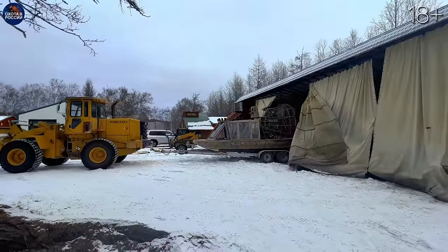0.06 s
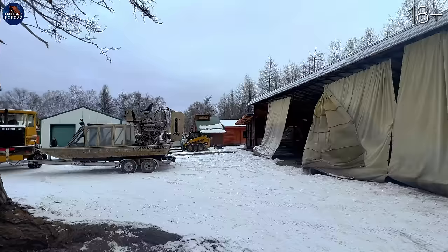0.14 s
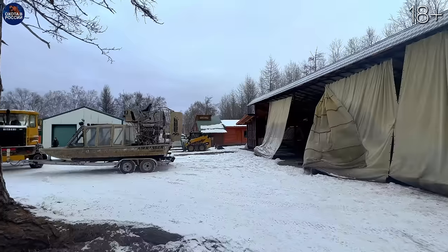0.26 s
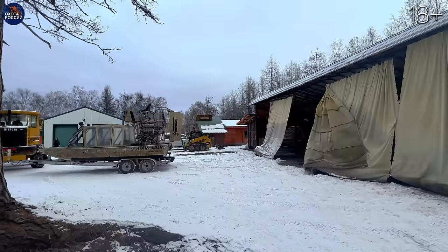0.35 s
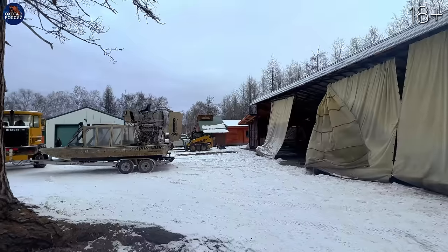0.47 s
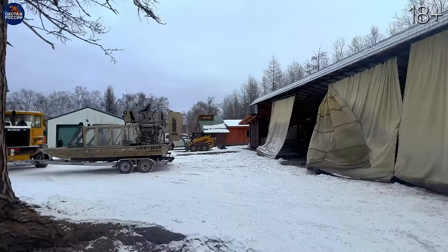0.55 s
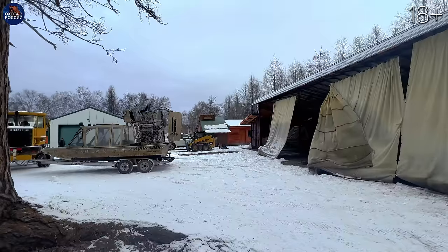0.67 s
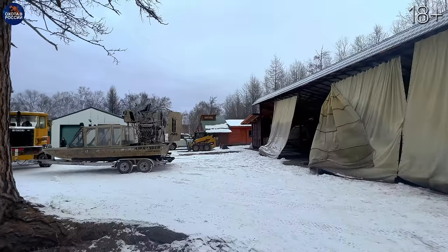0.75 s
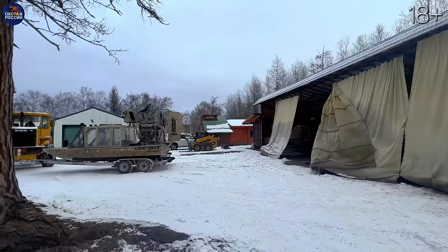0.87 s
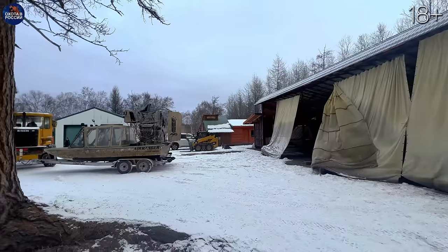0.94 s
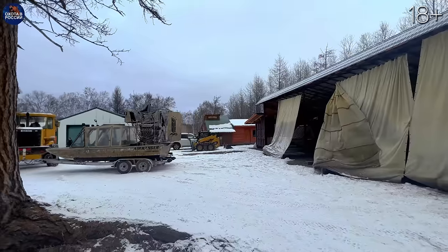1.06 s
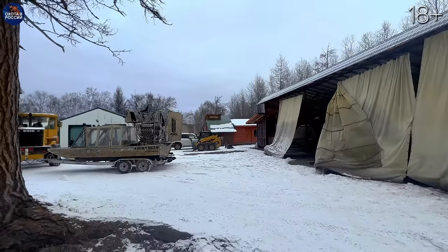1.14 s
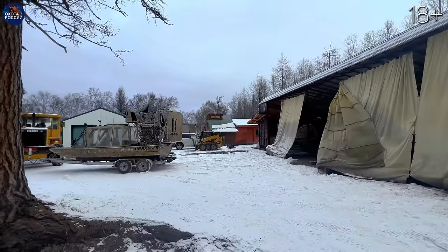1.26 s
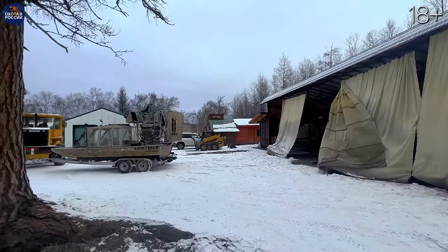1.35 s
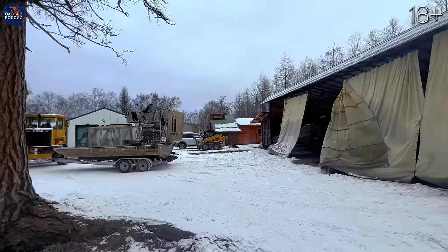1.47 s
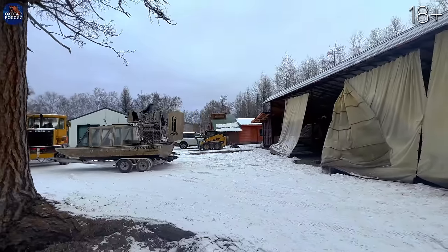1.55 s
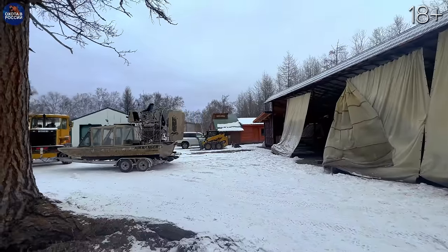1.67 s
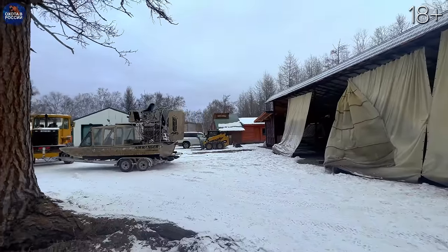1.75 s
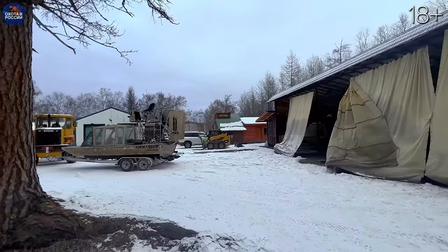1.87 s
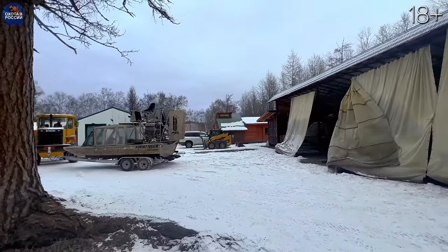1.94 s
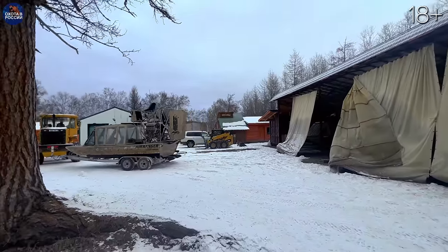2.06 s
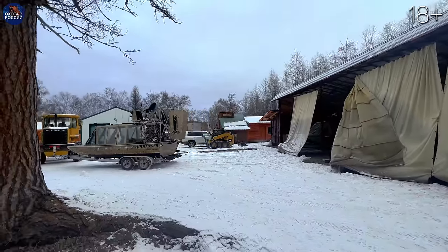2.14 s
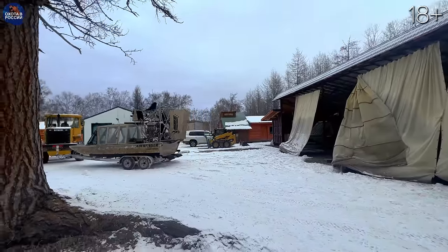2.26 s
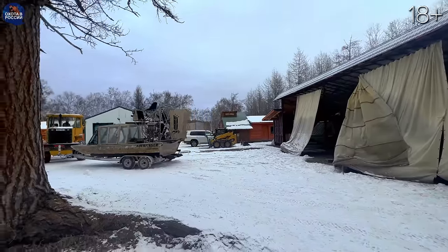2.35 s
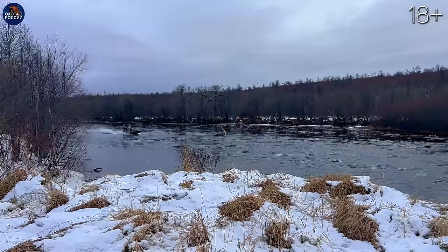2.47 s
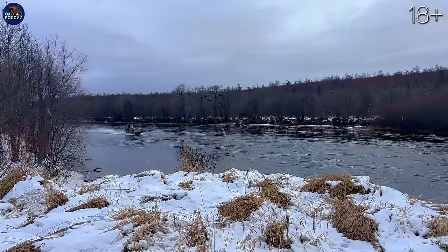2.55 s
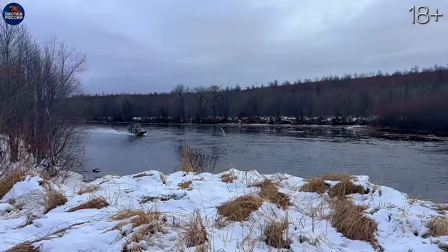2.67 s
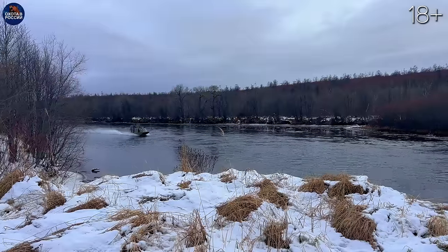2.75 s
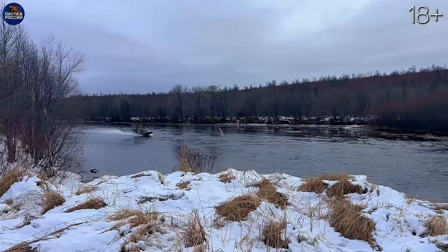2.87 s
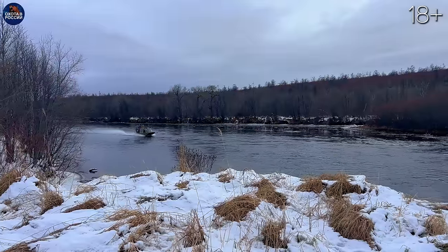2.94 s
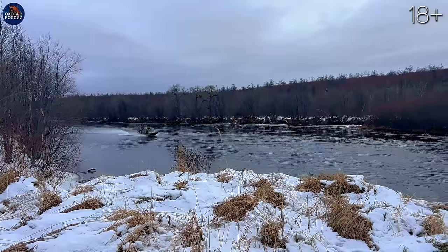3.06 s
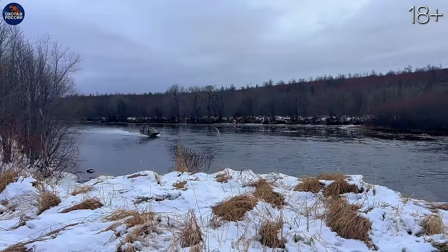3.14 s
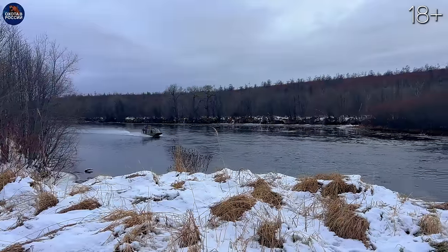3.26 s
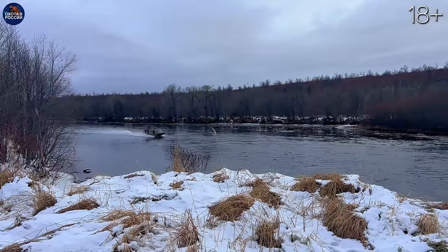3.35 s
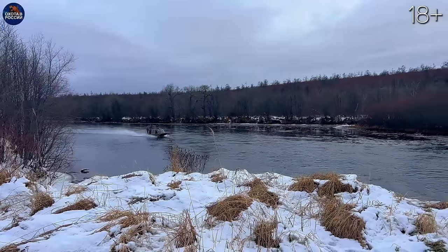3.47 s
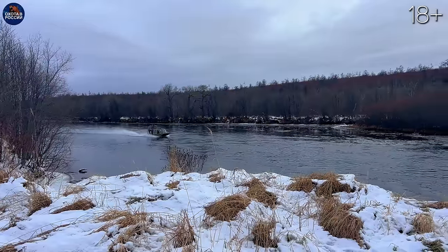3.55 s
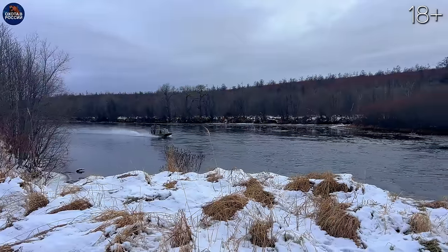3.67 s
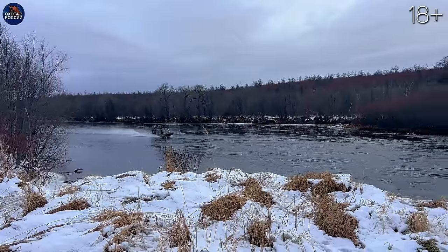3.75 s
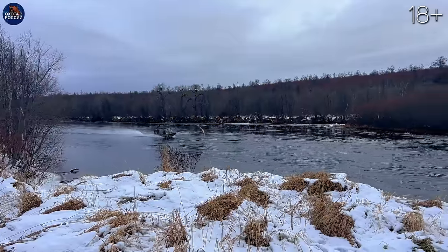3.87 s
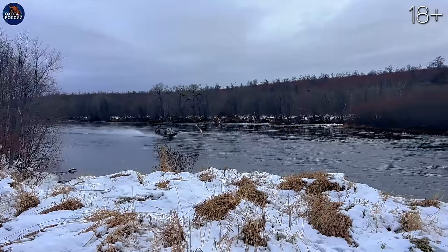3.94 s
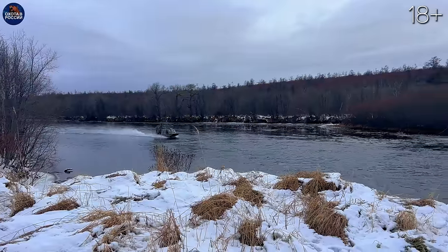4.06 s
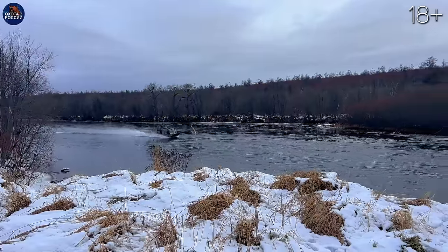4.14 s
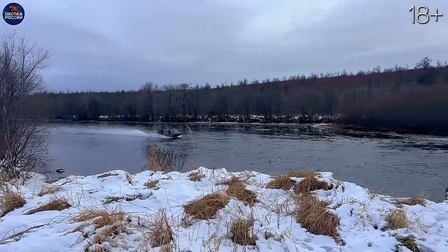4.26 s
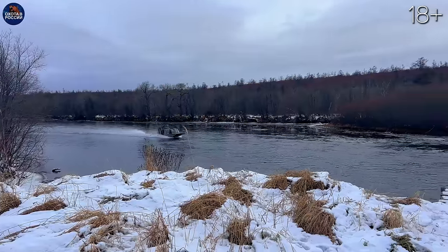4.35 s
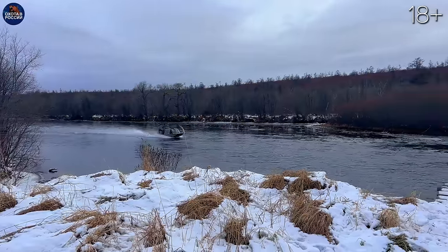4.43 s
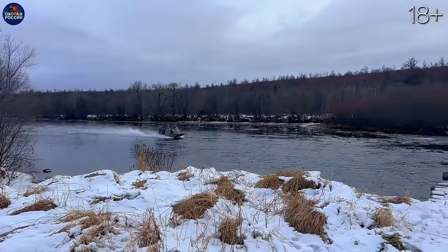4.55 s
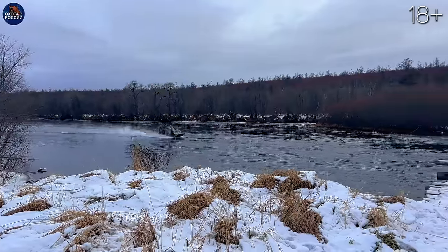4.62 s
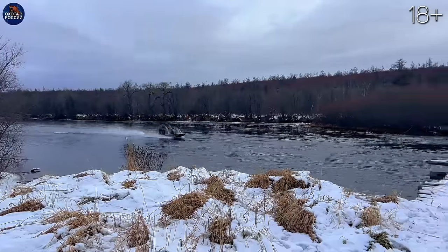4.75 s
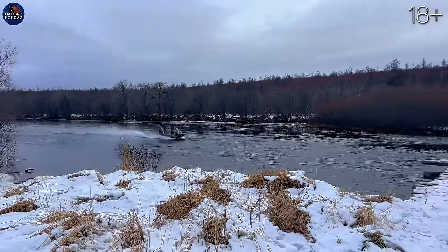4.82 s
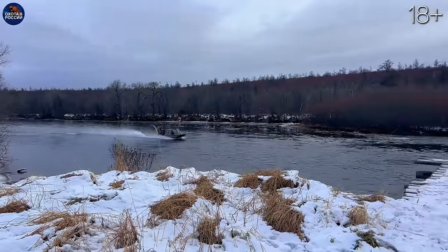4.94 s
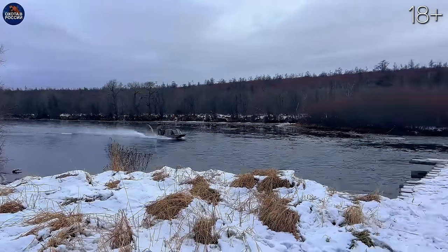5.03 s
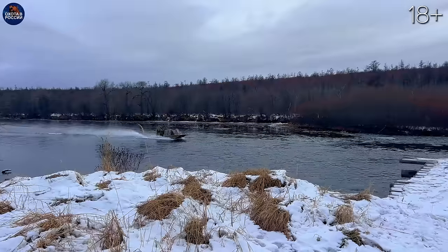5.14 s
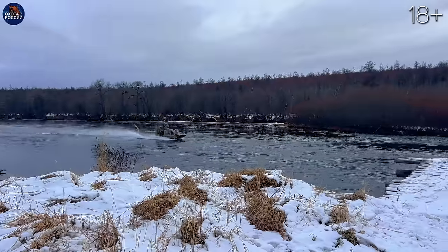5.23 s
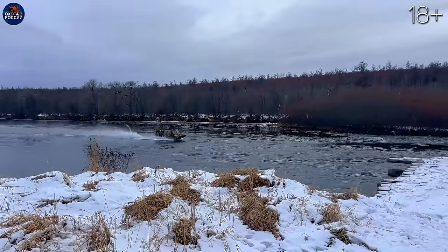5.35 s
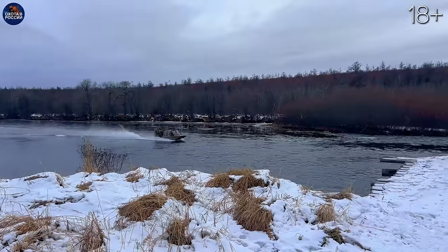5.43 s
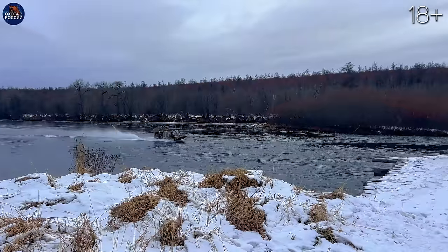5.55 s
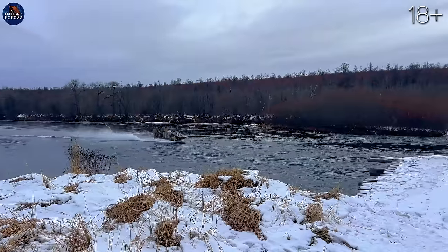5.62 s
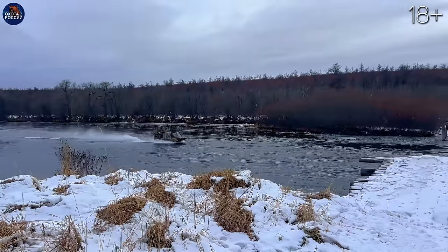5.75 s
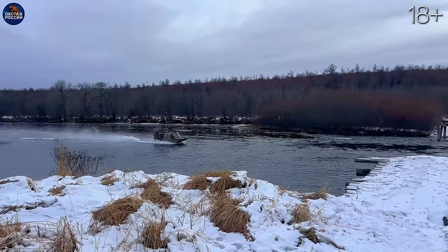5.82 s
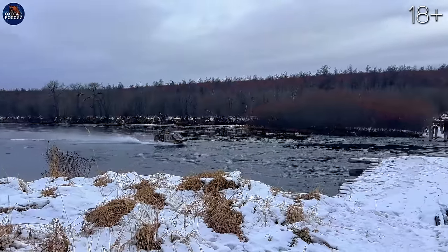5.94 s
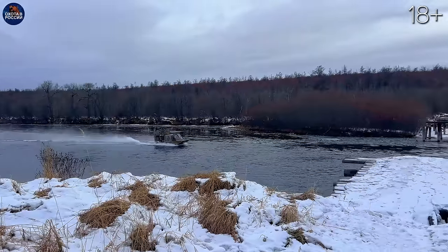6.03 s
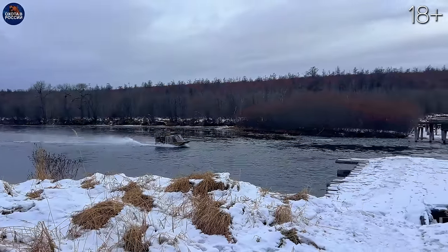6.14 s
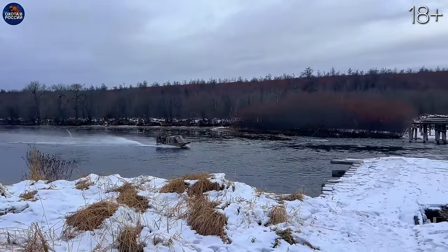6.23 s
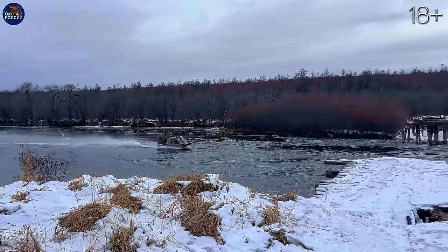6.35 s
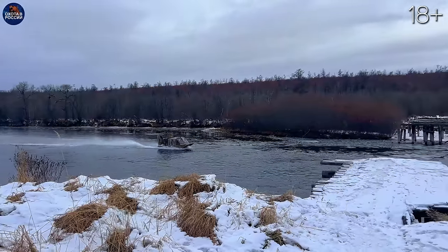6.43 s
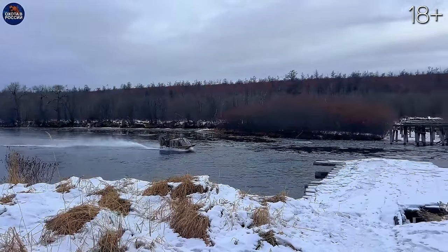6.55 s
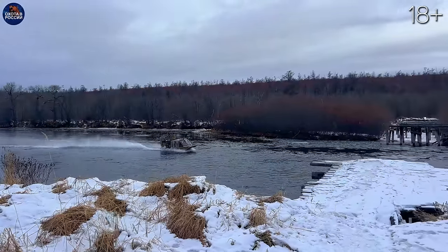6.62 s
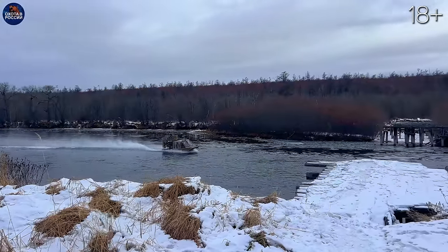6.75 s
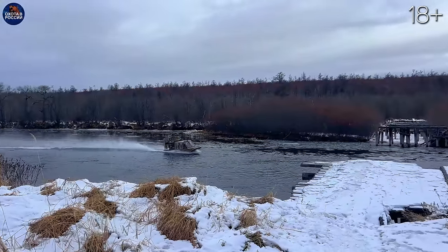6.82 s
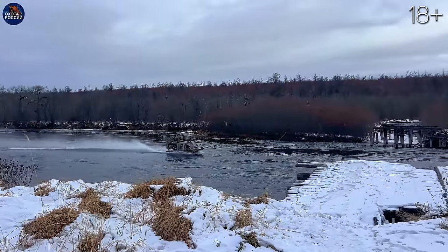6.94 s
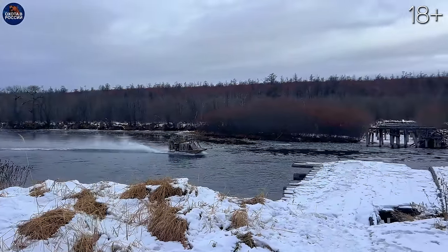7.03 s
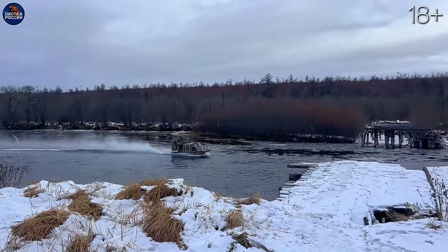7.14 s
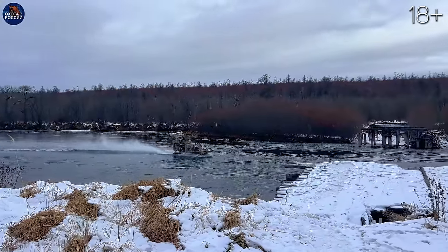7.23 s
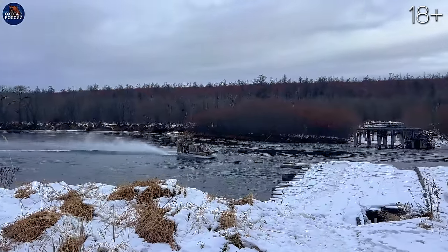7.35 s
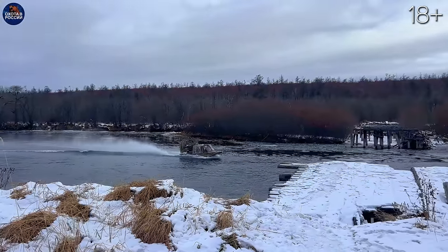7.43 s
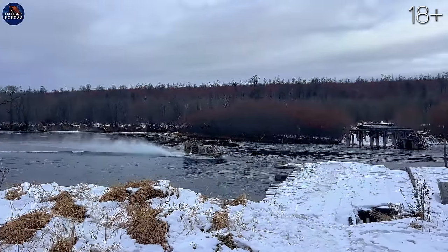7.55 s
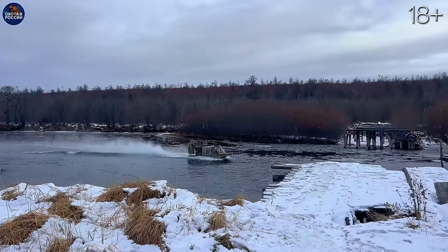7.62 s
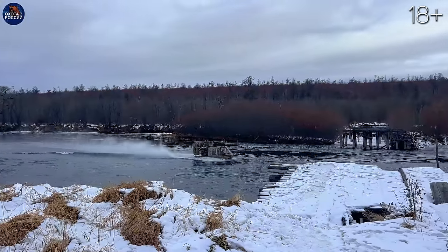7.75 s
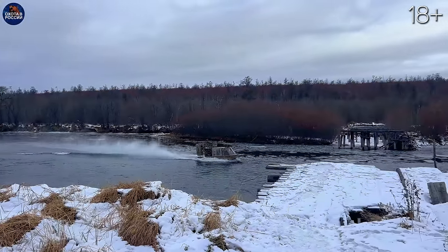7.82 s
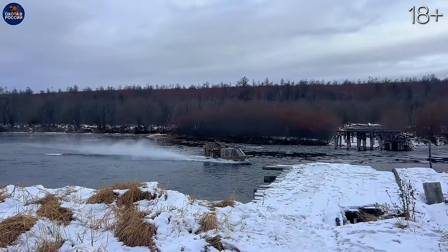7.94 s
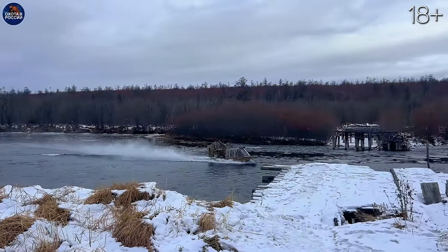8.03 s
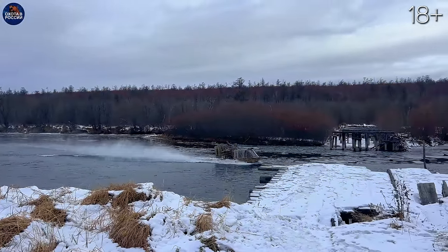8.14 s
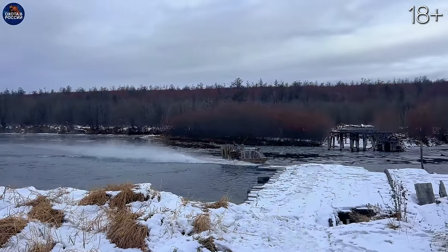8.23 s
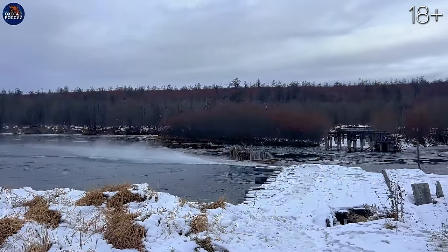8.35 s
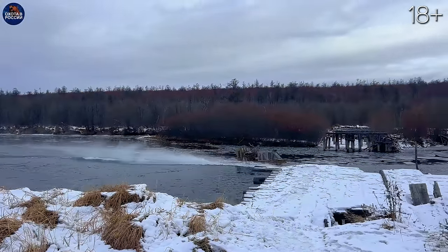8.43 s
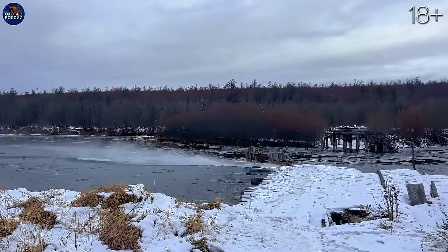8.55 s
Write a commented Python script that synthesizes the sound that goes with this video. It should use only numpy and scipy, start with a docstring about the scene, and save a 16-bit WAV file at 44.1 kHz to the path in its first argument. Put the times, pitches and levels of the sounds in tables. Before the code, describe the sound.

A stereo microphone outdoors first catches a large diesel engine: two short, booming revs, then a chugging idle under faint high hydraulic singing. The sound blends into a distant airboat opening its throttle. Its steady low drone flutters quickly, chopped air rasping and buzzing around it; over six seconds it draws closer, gaining exhaust bark, bright spray-like hiss and power, still loud at the end.

```python
"""Wheel loader, then airboat

A diesel wheel loader revs twice in a snowy yard and drops to idle, its hydraulics singing faintly.
The yard dissolves into a river, where an airboat picks up speed and draws nearer. Its V8 exhaust and its
geared four-blade propeller are sums of tones; the strongest sound 14 Hz apart, so the drone throbs.
Noise in puffs makes the rasp and hiss of air chopped by the blades, and the loader's roar and clatter."""
import sys
import numpy as np
from scipy.fft import rfft, irfft, next_fast_len
from scipy.io import wavfile
from scipy.ndimage import map_coordinates

SR = 44100
rng = np.random.default_rng(int(sys.argv[2]) if len(sys.argv) > 2 else 0)


def log_audio(samples):
    """Write samples as a 16-bit WAV file to the path given in sys.argv[1]."""
    # one column per channel
    frames = np.atleast_2d(samples).T
    # limit to full scale, then quantise
    limited = np.clip(frames, -1, 1)
    pcm = np.round(limited * 32767).astype(np.int16)
    wavfile.write(sys.argv[1], SR, pcm)


N = 378819

# The loader's engine speed. Each row: time in seconds, firings per second.
LOADER_FIRING = [(0.0, 49.6), (0.15, 49), (0.3, 57), (0.41, 58), (0.5, 51), (0.6, 45.5), (0.76, 46),
                 (0.89, 50.5), (1.0, 52), (1.16, 51), (1.28, 35.5), (1.48, 38.8), (2.25, 35.6),
                 (2.45, 39.4)]
# The microphone pair, for sound from the yard and from the river. Each row: frequency in Hz,
# radians by which the left lags, left minus right in dB, likeness of the two (coherence, 0 to 1).
YARD_PORTS = [(80, 0.26, -1.5, 0.98), (305, 0.87, -4.5, 0.99), (517, -1.6, -9.5, 0.34),
              (1050, 0.5, 1, 0.26), (1400, -0.25, -2, 0.4), (2200, -1.24, -4.5, 0.99),
              (4270, -1.7, 0, 0.32), (5430, -1.6, 9.5, 0.33), (8450, -0.83, -4, 0.23)]
RIVER_PORTS = [(280, -.05, -1.7, .99), (520, -.45, -2.5, .98), (860, -1.6, 3, .95), (1060, -1.2, 4, .92),
               (1300, -1.9, 0, .92), (1480, -3.1, -1, .85), (1680, -4.3, 0, .75), (1830, -3.2, 0, .7),
               (2130, -6.3, -4, .8), (2360, -9.4, 1, .65), (2620, -12.6, 2, .7), (2860, -15.7, 5, .55),
               (3150, -18.8, 4, .75), (3700, -19.5, -1, .65), (4600, -21.5, 8, .3), (5700, -25, 2, .6),
               (7200, -26.4, 5, .45), (8300, -25.1, 0, .9), (15500, -12.6, 0, .9)]

RASP_DB = -38  # the blades' rasp with the boat at its closest, before its swells and dips


def amp(db):
    """Turns decibels into a gain."""
    return 10 ** (np.asarray(db) / 20)


def unit(x):
    """Scales a sound to rms 1."""
    return x / np.sqrt(np.mean(x ** 2) + 1e-20)


def along(points, hz):
    """Reads each column after the frequency at the given Hz, on a log axis."""
    f, *cols = np.transpose(points)
    return [np.interp(np.log(hz + 1), np.log(f + 1), c) for c in cols]


def curves(rows):
    """Gives one value per sample for each column after the time."""
    s, *cols = np.transpose(rows)
    return [np.interp(np.arange(N) / SR, s, c) for c in cols]


def swells(rows, lag_s=0):
    """Adds up (s, half length s, height) bumps, lag_s later: each swells, holds and ebbs."""
    squareness = 2.56  # higher: quicker rise and fall, flatter hold
    t = np.arange(N) / SR - lag_s
    return sum(height * np.exp(-abs((t - s) / half_s) ** squareness) for s, half_s, height in rows)


def wobble(rate):
    """A smooth random curve through rate random points a second."""
    points = rng.standard_normal(int(N * rate / SR) + 4)
    # worked out every 64 samples, then joined by straight lines
    coarse = map_coordinates(points, [np.arange(0, N + 64, 64) * rate / SR])
    return np.interp(np.arange(N), 64 * np.arange(len(coarse)), coarse)


def filtered(x, response):
    """Multiplies the spectrum of x by a response of frequency, which may be complex."""
    m = next_fast_len(N + SR // 10, real=True)
    return irfft(rfft(x, m) * response(np.fft.rfftfreq(m, 1 / SR)), m)[..., :N]


def rush(spectrum, ports):
    """Coloured stereo noise of rms 1, as alike in both ports as the direction allows."""
    def colour(hz):
        coherence = along(ports, hz)[2]
        turn = np.arccos(np.clip(coherence, 0, 1)) / 2
        return amp(along(spectrum, hz)[0]) * [np.cos(turn), np.sin(turn)]
    mid, side = filtered(rng.standard_normal((2, N)), colour)
    return unit(np.array([mid + side, mid - side]))


def heard(x, ports, shift=0):
    """Gives the two ports their phase and level differences, moved down in frequency by a share."""
    def response(hz):
        lag, balance_db, _ = along(ports, hz * (1 + shift))
        left = amp(balance_db / 2) * np.exp(-.5j * lag)
        right = amp(-balance_db / 2) * np.exp(.5j * lag)
        gains = np.array([left, right])
        return gains / np.sqrt(np.mean(abs(gains) ** 2, axis=0))
    return filtered(x, response)


def angle(rate):
    """Radians turned so far at a rate in turns per second."""
    return 2 * np.pi * np.cumsum(rate) / SR


def tone(phase):
    """A sine of rms 1 that starts anywhere in its cycle."""
    return np.sqrt(2) * np.sin(phase + rng.uniform(0, 2 * np.pi))


def puffs(phase, sharpness):
    """A gain of rms 1 that peaks once a cycle."""
    return unit(np.exp(sharpness * np.cos(phase)))


def hydraulics():
    """The pump hums and its valves sing thinly while the engine idles."""
    # Each row: frequency in Hz, level in dB before the 3 dB lift and the load below.
    valve_tones = [(5303, -78.5), (5884, -79), (7340, -88), (8021, -83)]
    # Each row: time in seconds, hydraulic load as a gain in dB.
    pump_load = [(1.5, -40.5), (1.6, -3), (2.25, -4.5), (2.6, -12)]
    load_db, = curves(pump_load)
    whine = 0
    for hz, db in valve_tones:
        whine = whine + amp(db + 3 + 2 * wobble(12)) * tone(angle(hz + 7 * wobble(30)))
    hum = amp(-53) * tone(angle(156 + 2 * wobble(4.5)))
    return amp(load_db) * (whine + hum)


def panel():
    """A loose sheet of metal, shaken once at the second rev, rings out as a fading sine."""
    start_s, pitch_hz, start_db, fall_60_db_s = 0.83, 1560, -50, 0.6
    t = np.maximum(np.arange(N) / SR - start_s, 0)
    return amp(start_db - 60 * t / fall_60_db_s) * np.sin(2 * np.pi * pitch_hz * t)


def lugging():
    """Fresh fuel in a slow engine knocks harshly: a band of noise, one burst for each firing."""
    # Each row: middle in seconds, half length in seconds, level in dB.
    knock_times = [(0.247, 0.09, -47), (0.702, 0.008, -48), (0.741, 0.027, -42)]
    centre_hz, half_width_hz = 1300, 120
    rate, = curves(LOADER_FIRING)
    noise = rng.standard_normal(N)
    knock = unit(filtered(noise, lambda hz: 1 / (1 + ((hz - centre_hz) / half_width_hz) ** 2)))
    level = swells([(s, half_s, amp(db)) for s, half_s, db in knock_times])
    return level * knock * puffs(angle(rate), sharpness=0.33)


def loader():
    """Diesel firings boom from the pipe and rattle the block; under load the engine roars and hisses."""
    # The driver's pedal, pressed (+) or lifted (-). Each row: middle in seconds, half length in
    # seconds, fuel over idle as a share of full.
    pedal = [(0.017, 0.12, 0.39), (0.264, 0.12, 1.01), (0.619, 0.1, -0.057), (0.724, 0.03, -0.075),
             (0.811, 0.085, 1.064), (0.93, 0.051, 0.15), (1.064, 0.048, 0.46), (1.331, 0.11, -0.45),
             (1.464, 0.072, 0.25)]
    # The drone above the boom, slower to rise and fall. Each row: time in seconds, pitch in Hz.
    drone_pitch = [(0.08, 98.3), (0.3, 107.6), (0.47, 112.7), (0.62, 104.7), (0.7, 93.5), (0.8, 87.6),
                   (0.95, 93.26), (1.06, 100.1), (1.2, 102.9), (1.27, 100.4), (1.36, 88.5), (1.48, 74.9),
                   (1.7, 75.7), (1.83, 77), (2.0, 75.45), (2.25, 74.1), (2.45, 81.53)]
    # How loud the drone is at each pitch. Each row: pitch in Hz, level in dB before a 4.5 dB cut.
    drone_level = [(72, -40.5), (86, -39.5), (95, -38), (101, -47.5), (108, -40), (116, -48)]
    # How the pipe colours its overtones. Each row: frequency in Hz, gain in dB.
    pipe = [(110, -4.5), (138, -7), (155, 0), (178, -11), (193, -5), (205, 5.5), (220, -2), (235, -10.5),
            (262, -3), (300, -13.5), (335, -8.5)]
    # Colours of three noises. Each row: frequency in Hz, relative level in dB per Hz.
    roar_colour = [(22, -40), (55, -5), (200, -1.5), (330, -2), (375, -11), (425, 0), (480, -4), (630, -6),
                   (700, 3.5), (770, -4), (850, 2), (980, -6.5), (1290, 1), (1420, -5.5), (1600, -14.5),
                   (1780, -6), (2000, -6.5), (2230, -15), (2500, -11.5), (2800, -22.5), (4500, -56)]
    hiss_colour = [(1500, -33), (2800, -2), (2980, 9), (3250, 2.5), (4000, 2.5), (4300, 3.5), (5300, 2.5),
                   (7000, -7.5), (8500, -5), (11000, -23.5), (13000, -36), (15700, -38)]
    clatter_colour = [(100, -7), (295, 10.5), (370, -5.5), (440, 6.5), (1000, -10), (1400, -24), (1900, -4),
                      (2060, -7.5), (2250, -15), (3200, -17.5), (5000, -50)]

    rate, = curves(LOADER_FIRING)
    drone_hz, = curves(drone_pitch)
    firing, drone = angle(rate), angle(drone_hz)
    load = swells(pedal)

    # the boom follows the fuel a little late, levels off near full and grows with the firing rate
    boom_load = np.tanh(swells(pedal, lag_s=0.027) / 0.85)
    boom_db = -47 + 14 * boom_load + 0.31 * (rate - rate.mean())
    exhaust = amp(boom_db) * tone(firing)
    drone_db, = along(drone_level, drone_hz)
    exhaust += amp(drone_db - 4.5 + 3.7 * wobble(18.0)) * tone(drone)
    # unequal cylinders
    exhaust += amp(-50.5 + 1.4 * wobble(6.4)) * tone(3 / 2 * firing + 4.65 * wobble(15.0))
    # speed and fuel drive the pipe harder
    overtone_db = -51.5 + 0.2 * (rate - 48) + 2.5 * load
    for hz in (3 * rate, 2 * drone_hz, 3 * drone_hz):
        level_db = overtone_db + along(pipe, hz)[0] + 2 * wobble(9)
        exhaust += amp(level_db) * tone(angle(hz) + 0.35 * wobble(14))

    roar_db = -51.5 + 12.5 * load + 1.23 * wobble(45.34)
    roar = amp(roar_db) * rush(roar_colour, YARD_PORTS) * puffs(firing, sharpness=0.13)
    hiss_db = -68 + 12 * load
    hiss = amp(hiss_db) * rush(hiss_colour, YARD_PORTS) * puffs(firing, sharpness=0.12)
    clatter_db = -53 + 0.15 * (rate - 41)  # a little louder at higher speed
    clatter = amp(clatter_db) * rush(clatter_colour, YARD_PORTS) * puffs(firing, sharpness=0.073)
    return exhaust + roar + hiss + clatter


def approach():
    """Levels along a straight course past the bank: all grow with nearness but the bark, which grows abeam."""
    # The blade noise swells and dips on its way over the water. Each row: time in seconds, gain in dB.
    water_swell = [(3.2, 0), (4.4, 0.88), (5.1, 0.4), (6.1, 1.7), (6.85, -0.5), (7.4, 0.5), (8.2, 0.5)]
    closest_m, closest_s, boat_m_per_s = 64, 8.52, 13.76
    t = np.arange(N) / SR
    distance_m = np.hypot(closest_m, boat_m_per_s * (t - closest_s))
    near_db = 20 * np.log10(closest_m / distance_m)  # 0 at the closest
    swell_db, = curves(water_swell)
    # each: level at the closest, then dB gained for each dB of nearness
    boom_db = -30.8 + 0.95 * near_db
    tone_db = -30.5 + 1.5 * near_db
    rasp_db = RASP_DB + 0.55 * near_db + swell_db
    hiss_db = -45.5 + 1.98 * near_db + swell_db
    # the open pipes swing towards the bank
    abeam = (1 + np.tanh((t - 6.27) / 1)) / 2
    bark_db = -36 + 7 * abeam
    return boom_db, tone_db, bark_db, rasp_db, hiss_db


def v8(cycle, boom_db, bark_db):
    """Uneven firing in each bank stresses the odd orders; the higher ones waver over the water."""
    # Each row: multiple of the four-stroke cycle, gain in dB.
    orders = [(1.333, -24), (2, -16), (2.667, -25), (3, 1), (4, -27), (5, -5), (6, -21.5), (7, -17.5),
              (8, -20), (9, -10.5), (10, -14.5), (11, -19.5), (11.5, -26), (14, -23), (15, -25), (16, -27),
              (17, -24), (21, -21), (23, -32.5), (26, -36), (27, -26.5)]
    throttle_s, throttle_span_s, light_load_db = 2.5, 0.037, -6.5
    hum_db = -32.5  # the middle orders hold their level while boom and bark grow
    # the whole exhaust is softer until the throttle is wide open
    t = np.arange(N) / SR
    eased_db = light_load_db * (1 - np.tanh((t - throttle_s) / throttle_span_s)) / 2
    out = np.zeros(N)
    for k, db in orders:
        level_db = boom_db if k < 4 else hum_db if k < 8 else bark_db
        unsteady = np.clip((k - 5) / 10, 0, 1) ** 2
        drift = unsteady * (4 * rng.standard_normal() + .5 * wobble(10))
        dispersion = np.pi / 5 * k ** 2  # the pipe spreads each pulse out in time
        gain = amp(level_db + db + (0.5 + 2.0 * unsteady) * wobble(6))
        out += gain * np.sqrt(2) * np.cos(k * cycle + dispersion + drift)
    return amp(eased_db) * out


def propeller(passing, tone_db):
    """Each blade leaves a lopsided suction pulse; scattered paths make its overtones fade and flutter."""
    # Each row: multiple of the blade rate, gain in dB. The first row is left out below.
    blade_overtones = [(1, 0), (2, -14), (3, -15.5), (4, -14), (5, -17), (6, -17.5), (7, -18), (8, -20.5),
                       (9, -22), (10, -23.5), (11, -20.5), (12, -25.5), (13, -27)]
    # How the third to fifth multiples carry over the water. Each row: time in seconds, gain in dB.
    buzz = [(2.3, -3.5), (3.1, 0.5), (5.0, 0), (6.5, -5), (7.3, -5.5), (8.0, 2.5), (8.5, 0)]
    fading, flutter = 0.22, 0.45  # slow and fast scattered shares of each overtone
    buzz_db, = curves(buzz)
    # the other overtones gain 0.45 dB for each dB of blade tone
    grown_db = 0.45 * (tone_db - tone_db[N // 2:].mean())
    out = amp(tone_db) * np.cos(passing)
    for k, db in blade_overtones[1:]:
        carried_db = buzz_db if 2 < k < 6 else grown_db
        scattered = np.clip((k - 1) / 3, 0, 1) ** 2
        a, b = (scattered * (fading * wobble(3) + flutter * wobble(30)) for _ in range(2))
        skew = (k - 1) * np.pi / 3
        spread = (k - 1) * (k - 2) * np.pi / 20
        phase = k * passing + skew + spread
        out += amp(-33.5 + db + carried_db) * ((1 + a) * np.cos(phase) + b * np.sin(phase))
    return -np.sqrt(2) * out


def airboat():
    """A reduction gear locks engine and propeller; strongest tones throb, 200 Hz overtones beat slowly."""
    # The crankshaft's speed. Each row: time in seconds, turns per minute.
    crank_speed = [(1.9, 3122), (2.3, 3094), (2.7, 3324), (3.2, 3402), (4.0, 3422), (5.0, 3437),
                   (6.5, 3434), (7.6, 3424), (8.05, 3360), (8.59, 3353)]
    # Colours of the chopped air, the spray and the finest spray.
    # Each row: frequency in Hz, relative level in dB per Hz.
    rasp_colour = [(22, -41), (65, -3), (165, -5.5), (240, -4), (300, -4), (420, -1.5), (550, -4),
                   (700, -4.5), (900, -8.5), (1150, -6), (1500, -12.5), (1750, -12.5), (2080, -15.5),
                   (2600, -19.5), (5000, -59)]
    spray_colour = [(900, -21), (1900, -2.5), (2700, 2), (3300, -1.5), (4500, -3), (5800, -6.5),
                    (6700, -13), (8300, -13), (9500, -14), (11000, -49), (15700, -42)]
    mist_colour = [(5000, -39), (8500, -27), (11300, 12.5), (13000, 6), (15700, -6)]
    gear_ratio = 2.2914  # crank turns for each propeller turn

    rpm, = curves(crank_speed)
    boom_db, tone_db, bark_db, rasp_db, hiss_db = approach()
    crank = angle(rpm / 60)
    passing = 4 * crank / gear_ratio - np.pi / 2  # four blades
    # the blade noise comes in puffs, one for each blade
    rasp_gain = amp(rasp_db + 0.89 * wobble(13))
    rasp = rasp_gain * rush(rasp_colour, RIVER_PORTS) * puffs(passing, sharpness=0.17)
    hiss_gain = amp(hiss_db + 0.31 * wobble(16))
    hiss = hiss_gain * rush(spray_colour, RIVER_PORTS) * puffs(passing, sharpness=0.099)
    # the air swallows the top treble, so it grows fastest as the boat nears
    mist_db = -67.0 + 2.0 * (hiss_db + 48) + 0.99 * wobble(17)
    mist = amp(mist_db) * rush(mist_colour, RIVER_PORTS)
    mesh = 48 * crank  # the gear whines 48 cycles for each crank turn
    whine_db = -58.5 + 2.7 * (rasp_db - RASP_DB) + 2.7 * wobble(8.8)
    gear_whine = amp(whine_db) * tone(mesh + 0.6 * wobble(13))
    engine = v8(crank / 2, boom_db, bark_db)  # a four-stroke cycle takes two turns
    return engine + propeller(passing, tone_db) + rasp + hiss + mist + gear_whine


def over_bank(x):
    """The snowy bank soaks up a band in the middle of the sound while the boat is far off."""
    # Each row: time in seconds, share of the band lost.
    bank_loss = [(2.9, 0.54), (4.4, 0.0083)]
    centre_hz, half_width_hz = 1110, 330
    lost, = curves(bank_loss)
    return x - lost * filtered(x, lambda hz: np.exp(-((hz - centre_hz) / half_width_hz) ** 2))


def hollowed(x, shift):
    """Narrow dips part the rasp into separate bands, differently in each port."""
    # Each row: centre in Hz, half width in Hz, left gain in dB, right gain in dB.
    narrow_dips = [(1530, 48, 0.5, -0.5), (1880, 117, -5, -5), (2410, 58, -1.5, -4), (3580, 80, -0.5, -6),
                   (4070, 104, -7, -4), (4550, 100, -6, 0), (5250, 90, -3.5, -9), (5685, 98, -7, -5),
                   (6210, 80, -5, -5), (6570, 90, -4, -7)]

    def response(hz):
        total_db = 0
        for dip_hz, width_hz, left_db, right_db in narrow_dips:
            shape = np.exp(-((hz * (1 + shift) - dip_hz) / width_hz) ** 2)
            total_db = total_db + np.outer([left_db, right_db], shape)
        return amp(total_db)
    return filtered(x, response)


def river():
    """The boat at the two ports; as its bearing turns it fades over to a copy with lower bands."""
    turn_s, turn_span_s, turn_shift = 7.5, 0.46, 0.027  # the shift is a share of the frequency
    boat = over_bank(airboat())
    far = hollowed(heard(boat, RIVER_PORTS), 0)
    abeam = hollowed(heard(boat, RIVER_PORTS, turn_shift), turn_shift)
    turned = (1 + np.tanh((np.arange(N) / SR - turn_s) / turn_span_s)) / 2
    return far + turned * (abeam - far)


def scene():
    """The yard fades out as the river fades in."""
    # Each row: time in seconds, yard gain in dB, river gain in dB.
    dissolve = [(1.8, 4.5, -38), (2.1, 4.5, -11.5), (2.4, 4, -6), (2.75, 2, -2), (2.95, -34.5, -1.9)]
    yard_db, river_db = curves(dissolve)
    yard = heard(loader() + lugging() + panel() + hydraulics(), YARD_PORTS)
    return amp(yard_db) * yard + amp(river_db) * river()


def record(dry):
    """The microphone sheds the deepest rumble; nothing is kept above the band limit."""
    low_cut_hz, top_hz = 24, 15750
    return filtered(dry, lambda hz: (hz < top_hz) * (1 - np.exp(-(hz / low_cut_hz) ** 4)))


dry = scene()
out = record(dry)
log_audio(out)
```